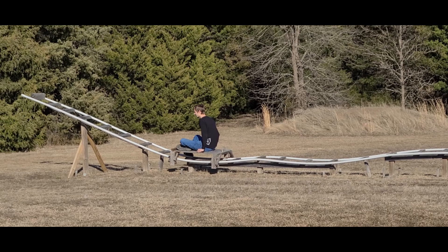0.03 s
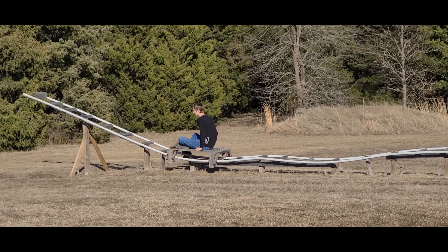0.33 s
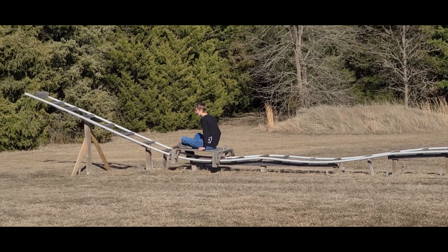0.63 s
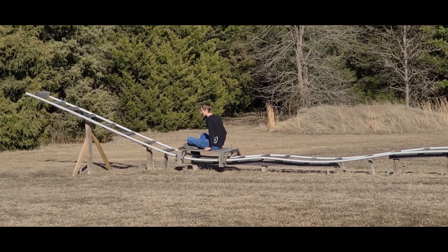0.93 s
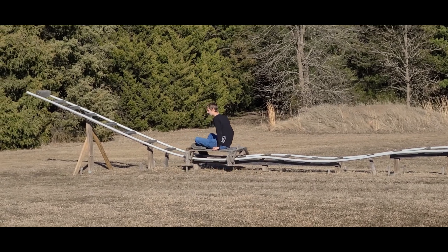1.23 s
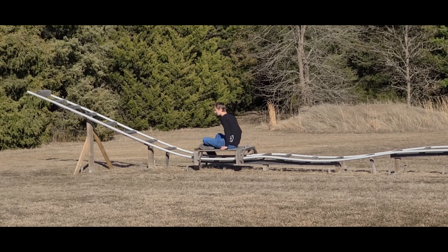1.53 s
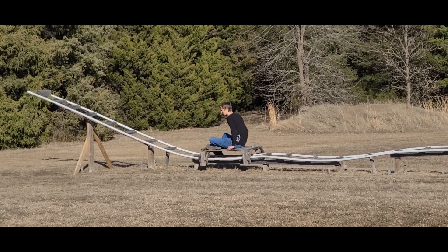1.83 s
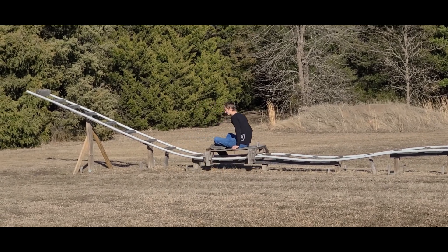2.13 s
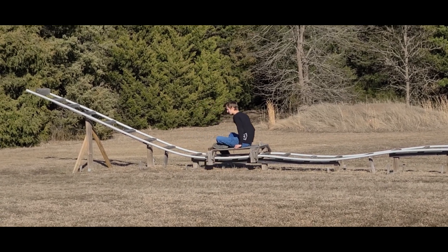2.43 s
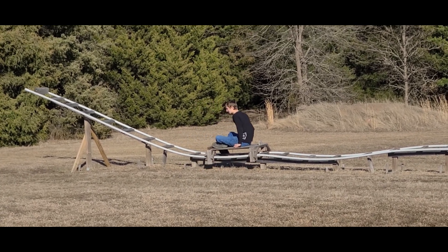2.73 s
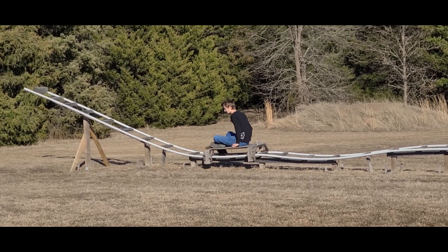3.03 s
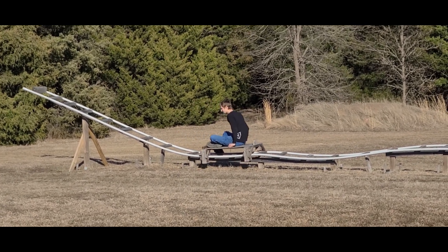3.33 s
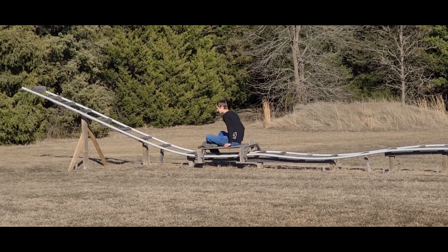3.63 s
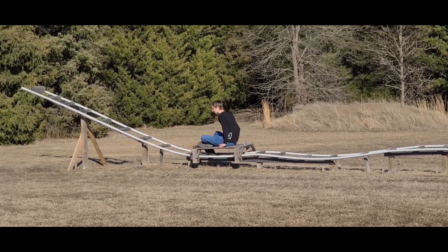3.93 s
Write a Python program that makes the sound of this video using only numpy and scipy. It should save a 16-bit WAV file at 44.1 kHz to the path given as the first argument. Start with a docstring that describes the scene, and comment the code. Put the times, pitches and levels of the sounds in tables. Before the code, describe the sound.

Gusty wind buffets the microphone while a far-off cart faintly scrapes and ticks along rails.

```python
"""Gusts rumble and thump on the microphone's two openings (ports), hardest on the right.
Far off in an open field, a cart coasts to and fro in the dip of a homemade rail track.
Its wheels rub the rails, so they scrape and ring, then squeak thinly and tick as it slows.
Small birds chirp faintly in the trees, over the even hush of the air."""
import sys
import numpy as np
from scipy import signal
from scipy.fft import rfft, irfft
from scipy.io import wavfile
from scipy.ndimage import uniform_filter1d

SR = 44100
rng = np.random.default_rng(int(sys.argv[2]) if len(sys.argv) > 2 else 0)


def store_pcm(level_fs):
    """Save levels as 16-bit WAV."""
    pcm = np.round(np.clip(level_fs, -1, 1) * 32767).astype(np.int16)
    wavfile.write(sys.argv[1], SR, np.atleast_2d(pcm).T)


N = 176400
T = np.arange(N) / SR

# How strong the wind is at each port: t/s, relative level/dB
GUSTS_LEFT = [(0.0, -48), (0.12, -18), (0.51, -30), (0.72, -22.5), (0.9, -36.5), (1.07, -17.5), (1.31, -35),
              (1.56, -36), (1.74, -30), (1.86, -44.5), (1.95, -27), (2.01, -47.5), (2.5, -43), (2.7, -38),
              (2.85, -48.5), (3.03, -32.5), (3.28, -57.5), (3.36, -39.5), (3.54, -44.5), (3.66, -31.5),
              (3.99, -33)]
GUSTS_RIGHT = [(0,-17),(.11,-19.5),(.28,-18),(.36,-26),(.42,-20.5),(.53,-20.5),(.66,-30),(.72,-21.5),(.82,-36),(.95,-31.5),(1.12,-25.5),(1.29,-23.5),(1.35,-34),(1.62,-30),(1.71,-25),(1.79,-30),(1.88,-28),(2.01,-40),(2.14,-28),(2.24,-37.5),(2.43,-25.5),(2.58,-34.5),(2.69,-27),(2.77,-39),(2.83,-33.5),(3.03,-39),(3.18,-47),(3.29,-30),(3.41,-36.5),(3.5,-30),(3.58,-31),(3.71,-20.5),(3.79,-26.5),(3.99,-22.5)]
# Spectra (how strong each frequency is) of the wind's rumble and flutter: f/Hz, relative level/dB
RUMBLE_LEFT_SPECTRUM = [(10, -15.5), (30, 2), (55, 7), (110, -11), (150, -15.5), (220, -27), (350, -60.5),
                        (700, -89.5)]
RUMBLE_RIGHT_SPECTRUM = [(10, -15), (28, -5.5), (48, 0), (80, -5), (112, -4), (150, -16), (210, -25.5),
                         (700, -93.5)]
FLUTTER_SPECTRUM = [(80, -11), (125, 6.5), (170, 7.5), (245, -1), (340, -8), (470, -19.5), (620, -27),
                    (850, -39.5), (3000, -91.5)]
# Wheels scraping the rails: t/s, hiss level/dB, ringing level/dB
SCRAPE_LEVELS = [(0, -63, -63.5), (.25, -65, -70), (.43, -75.5, -76.5), (.5, -86.5, -90), (.6, -100, -100)]
# The wheels' high ringing tones and their lowest, close-set ones: f/Hz, width/Hz, relative level/dB
HIGH_RING_TONES = [(3860, 150, -7.5), (4107, 65, 0.5), (5320, 64, -6.5), (5840, 200, -7), (9810, 130, -13),
                   (11950, 250, -16.5)]
LOW_RING_TONES = [(2518, 12, -2.5), (2550, 18, -11), (2610, 21, 0.5)]
# How loud the lowest tones and the rolling are: t/s, level/dB
LOW_RING_LEVEL = [(0, -81), (.12, -66), (.3, -83), (.33, -66.5), (.41, -69.5), (.49, -75.5), (.53, -86),
                  (.76, -100)]
ROLLING_LEVEL = [(1.0, -76.5), (1.13, -69), (1.4, -72.5), (1.52, -66.5), (1.75, -70), (1.92, -73),
                 (2.05, -71), (2.6, -76.5), (3.4, -77.5), (3.6, -72.5), (3.8, -79.5), (3.98, -70)]
# Spectra of the scraping, the rolling, the still air and a tick: f/Hz, relative level/dB
SCRAPE_SPECTRUM = [(900, 5.5), (2400, -7), (3900, 1), (6100, -0.5), (8700, -11.5), (12000, -12),
                   (16000, -24)]
ROLLING_SPECTRUM = [(600, 14), (1700, 1.5), (3700, 4.5), (7500, -2.5), (15000, -17.5)]
AIR_SPECTRUM = [(30, 10), (200, -10), (700, -4), (1100, -12), (1700, -12.5), (2400, -18.5), (5000, -25.5),
                (6900, -19.5), (8500, -33), (10500, -31.5), (12000, -22.5), (15500, -28.5)]
TICK_SPECTRUM = [(500, 4), (2500, -8.5), (3700, 1), (5800, -4.5), (15000, -17)]
# Swirls of air that thump the right port: t/s, level/dB, half width/s, push (+1) or pull (-1)
SWIRLS = [(0.191, -14.5, 0.0012, -1), (0.249, -2, 0.0039, 1), (0.2543, -12, 0.0013, -1),
          (0.2968, -2, 0.003, 1), (0.3987, -9, 0.0026, -1), (0.438, -13, 0.0019, -1),
          (0.4442, -4.5, 0.0013, 1), (1.1139, -13, 0.0029, 1), (1.7285, -14.5, 0.0038, 1),
          (2.1392, -21.5, 0.0043, -1), (2.673, -20, 0.0022, -1), (2.7212, -22.5, 0.0023, -1),
          (3.708, -13, 0.0021, 1)]
# Brief puffs at the right port: t/s, level/dB, half length/s
AIR_PUFFS = [(0.192, -26.5, 0.0058), (0.2524, -18.5, 0.0045), (.276, -36, 0.0054), (0.301, -25.5, 0.0097),
             (0.4391, -24, 0.0025), (0.609, -27.5, 0.0058), (0.623, -32, 0.0034), (0.497, -35.5, 0.0051),
             (0.737, -33.5, 0.0039), (1.125, -36.5, 0.0042), (1.685, -35.5, 0.0046), (2.147, -43.5, 0.0039),
             (2.392, -34, 0.0041), (2.79, -43.5, 0.0038), (3.487, -40.5, 0.0022), (3.706, -39, 0.0034),
             (3.832, -34.5, 0.011)]
# A wheel's thin squeak: t/s, f/Hz, level/dB
SQUEAK_PATH = [(.88, 8400, -100), (.93, 8540, -82), (1.07, 8550, -78.5), (1.13, 7600, -75.5),
               (1.27, 8630, -74.5), (1.36, 9100, -93), (1.47, 9810, -75.5), (1.6, 9150, -83),
               (1.7, 9500, -75), (1.76, 9920, -100)]
# Ticks of the rattling cart: t/s, relative level/dB
CART_TICKS = [(1.4686, -52), (1.51, -47.5), (1.5325, -50), (1.573, -50), (1.5972, -49), (1.639, -50.5),
              (1.6767, -53), (1.7135, -50.5), (1.7552, -51), (1.8114, -53), (1.8455, -54.5), (2.479, -58.5),
              (2.577, -60.5), (3.495, -58.5), (3.5676, -54.5), (3.654, -54.5)]
# Wheel tones that a tick sets ringing: f/Hz, level/dB added to the tick's
CLINK_TONES = [(1680, -20), (3690, -18), (5300, -25), (5750, -22)]
# Distant bird chirps: t/s, length/s, first f/Hz, last f/Hz, level/dB
BIRD_CHIRPS = [(2.258, 0.091, 1980, 1860, -78), (2.939, 0.025, 2250, 2400, -74),
               (3.421, 0.071, 1890, 1767, -78)]

CART_PAN_DB = -4.5  # left minus right: the cart is a little to the right


def amp(db):
    """Turns decibels into a number to multiply by."""
    return 10 ** (np.asarray(db) / 20)


def unit(x):
    """Scales each channel to an average (rms) size of 1."""
    return x / np.sqrt(np.mean(x ** 2, -1, keepdims=True) + 1e-20)


def curve(table, column=1):
    """Joins a column's points over time with straight lines, holding the first and last values."""
    rows = np.array(table, float)
    return np.interp(T, rows[:, 0], rows[:, column])


def noise(gain):
    """Noise of size 1, with each frequency f weighted by gain(f)."""
    return unit(irfft(rfft(rng.standard_normal(N)) * gain(np.fft.rfftfreq(N, 1 / SR)), N))


def coloured(spectrum):
    """Noise shaped by a spectrum table."""
    hz, db = np.transpose(spectrum)
    return noise(lambda f: amp(np.interp(np.log(f + 1), np.log(hz), db)))


def wander(hz):
    """A random wobble, up to about hz times a second."""
    return noise(lambda f: np.exp(-(f / hz) ** 2))


def steadied(x, span_s, share):
    """Evens out a share (0 to 1) of a noise's chance swells."""
    window = np.exp(-((np.arange(8001) - 4000) / SR / span_s) ** 2)
    power = signal.fftconvolve(x ** 2, window, "same") / signal.fftconvolve(np.ones(N), window, "same")
    return unit(x / (abs(power) + 1e-9) ** (share / 2))


def pan(db):
    """Left and right gains, with the left louder by db."""
    return amp(np.array([[db], [-db]]) / 2)


def spread(make, same):
    """Two channels of a random sound; same (0 to 1) is the part they share."""
    return np.sqrt(same) * make() + np.sqrt(1 - same) * np.array([make(), make()])


def port_wind(gusts, spectrum, flutter_db):
    """Churning air rumbles at one port; stronger gusts add a higher, lumpy flutter."""
    gust_db = curve(gusts)
    rumble = steadied(coloured(spectrum), span_s=0.069, share=1.0) * amp(gust_db)
    flutter = steadied(coloured(FLUTTER_SPECTRUM) * amp(5.7 * wander(50)), span_s=0.0076, share=0.45)
    growth_db = 1.774 * (gust_db + 20)  # zero in a gust of -20 dB; grows faster than the rumble
    return rumble + flutter * amp(flutter_db + growth_db)


def wind():
    """Each port catches its own gusts."""
    left = port_wind(GUSTS_LEFT, RUMBLE_LEFT_SPECTRUM, flutter_db=-43)
    right = port_wind(GUSTS_RIGHT, RUMBLE_RIGHT_SPECTRUM, flutter_db=-29.5)
    return np.array([left * amp(-0.5), right * amp(-1.5)])


def grainy(x, depth_db, size=512):
    """Uneven contact makes narrow bands of a rubbing noise flare up briefly, each on its own."""
    bands = signal.stft(x, nperseg=size)[2]
    patches = uniform_filter1d(rng.standard_normal(bands.shape[1:]), size=5, axis=0)  # blur in pitch
    patches = uniform_filter1d(patches, size=3, axis=1)  # blur in time
    flared = bands * amp(depth_db * patches / patches.std())
    return unit(signal.istft(flared, nperseg=size)[1][:, :N])


def rubbed(tones):
    """Rubbing keeps a wheel ringing: a narrow band of noise for each tone."""
    return unit(sum(amp(db) * noise(lambda f: 1 / (1 + ((f - hz) / width * 0.73) ** 2))
                    for hz, width, db in tones))


def scrape():
    """The wheels rub the rails: a grainy hiss and ringing tones that fade as the cart slows."""
    hiss = grainy(spread(lambda: coloured(SCRAPE_SPECTRUM), same=0.47), depth_db=4.5)
    hiss *= amp(curve(SCRAPE_LEVELS) + 0.91 * wander(120))
    high_ring = grainy(spread(lambda: rubbed(HIGH_RING_TONES), same=0.29), depth_db=3.5)
    high_ring *= amp(curve(SCRAPE_LEVELS, column=2) + 2 * wander(70))
    low_ring = spread(lambda: steadied(rubbed(LOW_RING_TONES), span_s=0.012, share=0.94), same=0.41)
    low_ring *= amp(curve(LOW_RING_LEVEL) + 2 * wander(60))
    return (hiss + high_ring) * pan(CART_PAN_DB) + low_ring * pan(-1.6)


def rolling():
    """The wheels roll along the rails with a gritty hiss."""
    hiss = spread(lambda: coloured(ROLLING_SPECTRUM), same=0.29)
    return hiss * amp(curve(ROLLING_LEVEL) + 2.3 * wander(120)) * pan(CART_PAN_DB)


def air(level_db=-66):
    """The still air of the field makes an even hush."""
    return spread(lambda: coloured(AIR_SPECTRUM), same=0.06) * amp(level_db + 0.36 * wander(7.1))


def thumps(tip_share=0.2, tip_width=0.24, cutoff_hz=920):
    """Each swirl passing the right port makes a dull pressure spike between two opposite swings."""
    pressure = np.zeros(N)
    for at, db, width, sign in SWIRLS:
        offset = (T - at) / width
        body = (1 - offset ** 2) * np.exp(-offset ** 2 / 2)
        tip = np.exp(-(offset / tip_width) ** 2 / 2)
        pressure += sign * amp(db) * ((1 - tip_share) * body + tip_share * tip)
    dulled = irfft(rfft(pressure) / (1 + (np.fft.rfftfreq(N, 1 / SR) / cutoff_hz) ** 6), N)
    return np.array([np.zeros(N), dulled])


def puffs(db_per_octave=43, size=8192):
    """Short bursts of churning air hit the right port; stronger ones sound brighter."""
    out = np.zeros((2, N))
    hz = np.fft.rfftfreq(size, 1 / SR)
    t = (np.arange(size) - size / 2) / SR
    for at, db, half_length in AIR_PUFFS:
        corner_hz = 272 * 2 ** ((db + 31) / db_per_octave)  # 272 Hz for a puff of -31 dB
        ratio = hz / corner_hz
        swell = np.exp(-(t / half_length) ** 2 / 2)
        burst = irfft(rfft(rng.standard_normal(size) * swell) * ratio ** 1.5 / (1 + ratio ** 5.48))
        burst *= amp(db) * np.linalg.norm(swell) / np.linalg.norm(burst)
        out[1] += np.interp(T, at + t, burst, left=0, right=0)
    return out


def flap(at_s=0.2495, hz=560, peak_db=-20.5, half_length_s=0.0028):
    """The hardest swirl shakes the air in the right port for a few hollow-sounding cycles."""
    age = T - at_s
    swell = amp(peak_db) * np.exp(-(age / half_length_s) ** 2 / 2)
    return np.array([np.zeros(N), swell * np.cos(2 * np.pi * hz * age)])


def squeak(width_hz=480, upper_ratio=1.11, upper_db=-6.5):
    """A rubbing wheel squeaks in two scratchy, very high tones."""
    def rough_tone(angle):
        return wander(width_hz) * np.cos(angle) + wander(width_hz) * np.sin(angle)

    pitch_hz = curve(SQUEAK_PATH) * (1 + 0.012 * wander(19))
    phase = 2 * np.pi * np.cumsum(pitch_hz) / SR
    pair = spread(lambda: rough_tone(phase) + amp(upper_db) * rough_tone(phase * upper_ratio), same=0.3)
    scratchy = grainy(pair, depth_db=3.5)
    return scratchy * amp(curve(SQUEAK_PATH, column=2) + 3.1 * wander(45)) * pan(CART_PAN_DB)


def ticks(rise_s=0.0024, crack_s=0.0025, tail_s=0.016, tail_db=-13):
    """The cart rattles in dry ticks, each a quick crack with a short tail."""
    loudness = np.zeros(N)
    for at, db in CART_TICKS:
        age = np.maximum(T - at, 0)
        rise = np.minimum(age / rise_s, 1)
        since_peak = np.maximum(age - rise_s, 0)
        fade = np.exp(-since_peak / crack_s) + amp(tail_db) * np.exp(-since_peak / tail_s)
        loudness += amp(db - 10) * rise * fade
    return spread(lambda: coloured(TICK_SPECTRUM), same=0.51) * loudness * pan(CART_PAN_DB)


def clinks(rise_s=0.0024, ring_s=0.16):
    """Each tick sets the wheels ringing, with its own mix of their tones."""
    out = np.zeros((2, N))
    for at, db in CART_TICKS:
        ringing = (T > at) & (T < at + ring_s)
        age = T[ringing] - at
        rise = np.minimum(age / rise_s, 1)
        fade_db = -60 * age / ring_s
        for hz, tone_db in CLINK_TONES:
            strength, detune = rng.standard_normal(2)
            pitch_hz = hz * (1 + 0.03 * detune)
            tone = np.sin(2 * np.pi * (pitch_hz * age + rng.random((2, 1))))
            out[:, ringing] += amp(db + tone_db + 2 * strength + fade_db) * rise * tone
    return out * pan(CART_PAN_DB)


def birds(echo_s=0.043, echo_db=-5):
    """Birds whistle faint, sliding chirps, blurred by echoes from the trees."""
    song = np.zeros(N)
    for at, length, first_hz, last_hz, db in BIRD_CHIRPS:
        progress = np.clip((T - at) / length, 0, 1)
        pitch_hz = first_hz + (last_hz - first_hz) * progress
        song += amp(db) * np.sin(np.pi * progress) * np.sin(2 * np.pi * np.cumsum(pitch_hz) / SR)
    echoes = rng.standard_normal((2, N)) * np.exp(-T / echo_s)
    echoes /= np.linalg.norm(echoes, axis=1, keepdims=True)
    return song + amp(echo_db) * signal.fftconvolve(song[None], echoes, axes=1)[:, :N]


def scene():
    """Wind close by, the cart and the birds far off."""
    gusts = wind() + thumps() + puffs() + flap()
    cart = scrape() + rolling() + squeak() + ticks() + clinks()
    return gusts + cart + birds() + air()


def record(dry):
    """Cuts away the very highest treble, above 15750 Hz."""
    low_pass = signal.firwin(511, 15750, window=("kaiser", 9), fs=SR)
    return signal.oaconvolve(dry, low_pass[None], "same")


dry = scene()
out = record(dry)
store_pcm(out)
```